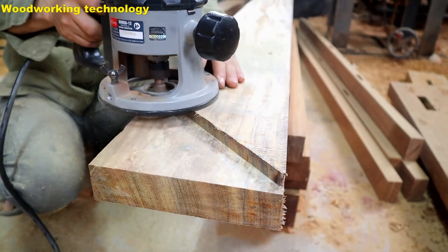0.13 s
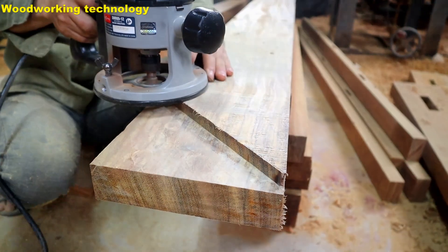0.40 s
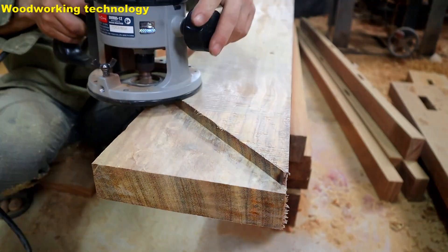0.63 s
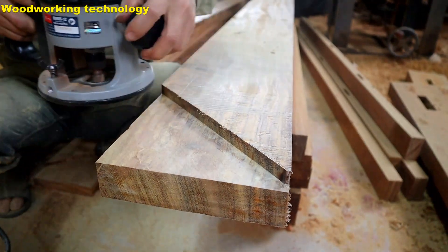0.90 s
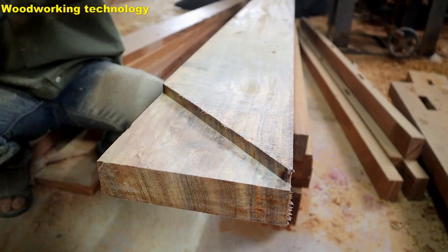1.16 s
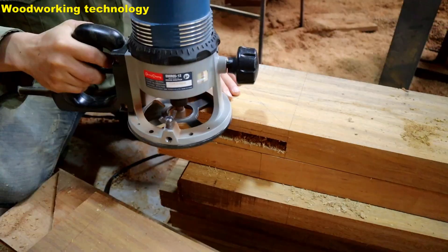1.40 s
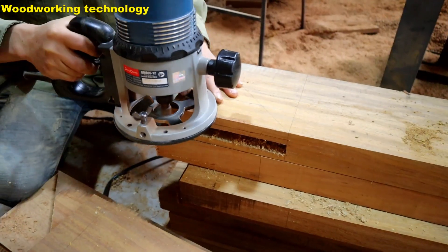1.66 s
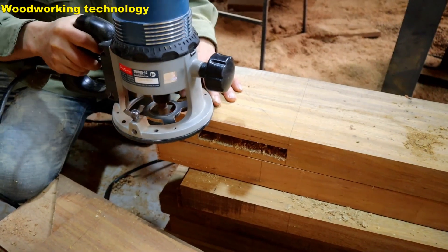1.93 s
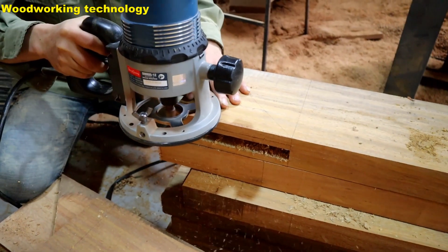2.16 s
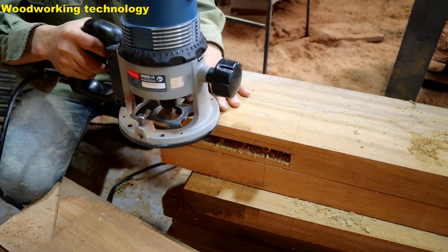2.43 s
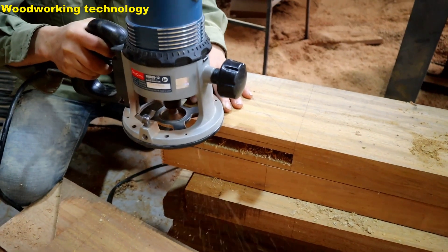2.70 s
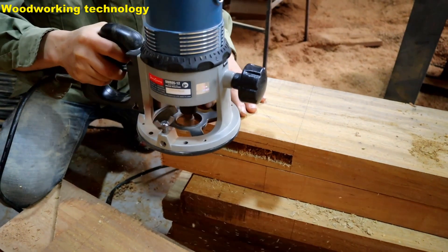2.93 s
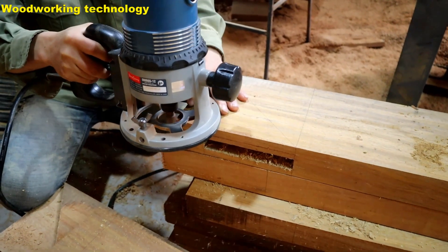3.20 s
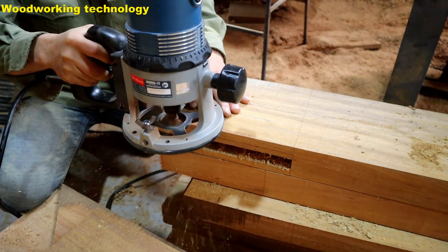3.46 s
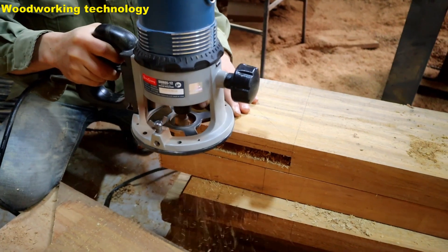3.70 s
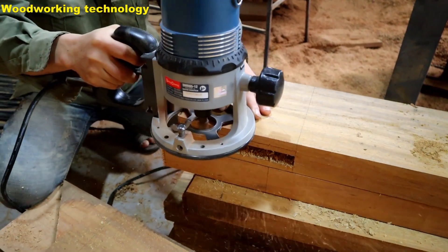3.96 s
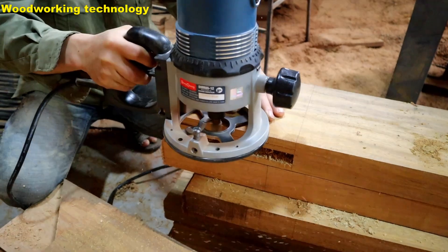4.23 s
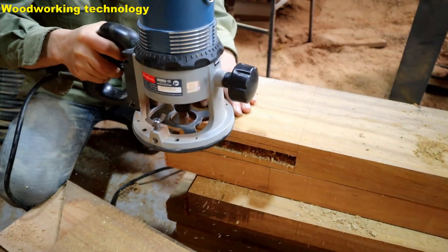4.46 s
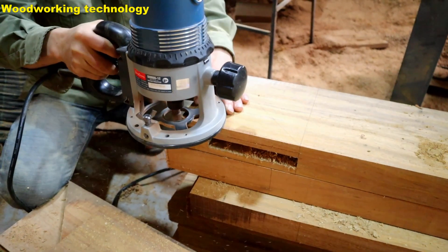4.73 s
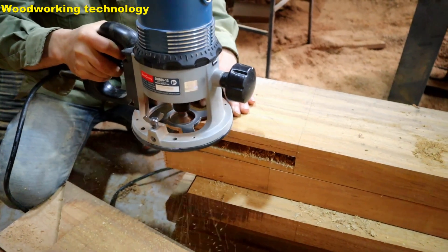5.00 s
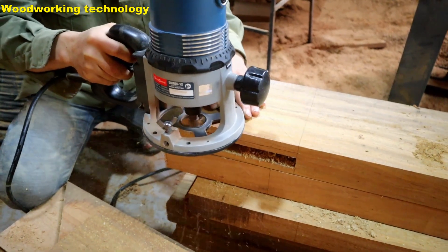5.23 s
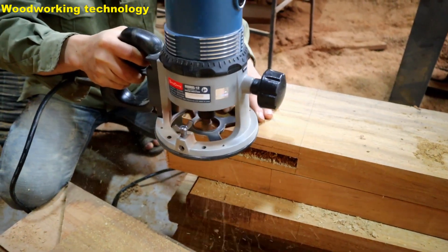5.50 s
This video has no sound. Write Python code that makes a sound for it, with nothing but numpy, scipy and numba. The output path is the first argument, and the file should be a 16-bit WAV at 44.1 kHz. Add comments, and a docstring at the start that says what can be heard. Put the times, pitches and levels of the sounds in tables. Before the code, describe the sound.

An electric router buzzes through wood and winds down, then abruptly spins up again and cuts in whining, hissing stretches, with one hard knock near the end.

```python
"""In a workshop, close to a two-port microphone, an electric router works hardwood: it ends one groove and runs
down; then the scene changes, and it spins up and cuts in stretches, some following on without a pause. The two-
flute bit is a stack of sines at multiples of the tooth rate; hum, fan whine and commutator whistle are sines on
the same rotation. Rushing air, chips, dust and a faint low rumble are shaped noise; loose timber, a sum of
decaying modes, knocks now and then."""
import sys
import numpy as np
from scipy import signal
from scipy.fft import rfft, irfft, next_fast_len
from scipy.io import wavfile
from scipy.ndimage import uniform_filter1d
from numba import njit

SR = 44100
rng = np.random.default_rng(int(sys.argv[2]) if len(sys.argv) > 2 else 0)


def pcm_store(signal):
    """Save signal as 16-bit PCM."""
    levels = np.round(np.clip(np.atleast_2d(signal), -1, 1) * 32767)
    wavfile.write(sys.argv[1], SR, levels.astype(np.int16).T)


N = 247842  # samples
BREAK_S = 1.434, 1.467  # end of the first run, start of the second
BREAK_MID_S = np.mean(BREAK_S)
FREE_HZ = 934  # tooth rate of the free-running motor
STRIDE = 64  # samples between points of a cutting envelope


def undb(db):
    """Logarithmic level: decibels to amplitude gain."""
    return np.exp(np.asarray(db) * (np.log(10) / 20))


def unit(x):
    """Normalisation of signal power: scale to rms 1."""
    return x / np.sqrt(np.mean(x ** 2))


# Phase lead of the left port over the right: f/Hz, phase/rad
PORT_PHASE = [(3000, 0.084), (5800, 0.38), (7200, 1.15), (11000, 1.41), (15500, 1.2)]


def colour(x, points, late=False):
    """Linear filtering in the frequency domain by (f/Hz, level/dB) points; late delays the phase for the right port."""
    size = next_fast_len(N, True)
    log_hz = np.log(np.arange(size // 2 + 1) * SR / size + 1)

    def read(rows):
        hz, value = np.transpose(rows)
        return np.interp(log_hz, np.log(hz), value)

    response = undb(read(points))
    if late:
        response = response * np.exp(-1j * read(PORT_PHASE))
    return irfft(rfft(x, size) * response, size)[..., :N]


@njit
def moving_band(x, hz, share):
    """Second-order resonance: state-variable band-pass with a moving centre; share is width over centre."""
    y, band, low = np.empty(len(x)), 0., 0.
    for i in range(len(x)):
        g = np.tan(np.pi * hz[i] / SR)
        v = (band + g * (x[i] - low)) / (1 + g * (g + share))
        band, low, y[i] = 2 * v - band, low + 2 * g * v, share * v
    return y


def walk(rate):
    """Low-frequency random fluctuation: levels held 1 / rate s and slewed twice; spread near 1."""
    hold = int(SR / rate)
    steps = np.repeat(rng.standard_normal(N // hold + 1), hold)
    return 1.43 * uniform_filter1d(uniform_filter1d(steps, hold), hold)[:N]


def tone(turns, waver_db):
    """Amplitude-modulated sine, rms 1 before its strength wavers, not quite alike at the two ports."""
    waver = waver_db * walk(14) + 2.2 * walk(4.13) * np.array([[1], [-1]])
    return np.sqrt(2) * undb(waver) * np.sin(2 * np.pi * (turns + rng.random()))


def curves(rows):
    """Piecewise-linear interpolation of (t/s, ..) rows; the rows nearest the break are moved to its edges."""
    s, *columns = np.array(rows, float).T
    after = np.searchsorted(s, BREAK_MID_S)
    s[after - 1:after + 1] = BREAK_S
    return [np.interp(np.arange(N) / SR, s, column) for column in columns]


# Speed of the bit: t/s, tooth rate f/Hz
SPEED = [(0, 913), (.17, 912.3), (.32, 908.1), (.4, 908.5), (.48, 918.2), (.57, 938.5), (.67, 953),
         (.78, 966.5), (.83, 968.3), (.9, 935.5), (1.17, 815.6), (1.43, 707.6), (1.48, 846.1),
         (1.56, 877.8), (1.65, 903.5), (1.78, 927.6), (1.93, 946.2), (2.1, 959.5), (2.18, 958), (2.34, 951),
         (2.44, 955.3), (2.58, 957), (2.68, 962), (2.95, 932.6), (3.12, 940.8), (3.3, 941.5), (3.4, 945.5),
         (3.56, 913.7), (3.75, 881.5), (3.93, 865.1), (4.04, 866.9), (4.14, 872.9), (4.41, 904.7),
         (4.66, 922.5), (4.83, 931.8), (5.02, 904.3), (5.35, 843.9), (5.48, 834.9), (5.62, 854)]


def tooth_rate():
    """Rotational kinematics: the tooth rate at every sample, in Hz."""
    return curves(SPEED)[0]


def motor_load(hz):
    """Torque balance: load is how far the speed lies under free running, plus how fast it falls, in Hz."""
    inertia_s = 0.24
    slope = SR * uniform_filter1d(np.gradient(hz), size=6000)
    return np.clip(FREE_HZ - hz - inertia_s * slope, 0, 200)


# How loudly the running motor reaches the ports:
# t/s, air level/dB, treble hiss level/dB, unbalance hum level/dB, fan whine level/dB
RUNNING = [(0, -38, -51, -62.5, -45.5), (.4, -38.5, -38, -65, -46.5), (.58, -35.5, -39.5, -58, -40.5),
           (.83, -35.5, -35.5, -54, -37), (1.15, -36, -40, -60, -47.5), (1.41, -35.5, -48, -62.5, -49),
           (1.49, -25, -27, -49.5, -41), (1.58, -25.5, -27.5, -47.5, -36.5), (1.78, -24.5, -27.5, -48, -38),
           (2.05, -25.5, -28, -38.5, -32), (2.22, -30, -29.5, -51.5, -30), (2.42, -29.5, -35, -47.5, -40),
           (2.62, -31, -33.5, -44, -38), (2.8, -30.5, -29, -53.5, -33), (3.12, -31, -30, -51.5, -38.5),
           (3.32, -32.5, -30, -49, -34), (3.51, -31.5, -33, -60.5, -34), (3.8, -32.5, -45, -53.5, -29.5),
           (4.0, -33, -30.5, -58, -42.5), (4.36, -31, -35, -54, -36.5), (4.7, -33.5, -32, -54, -39.5),
           (4.96, -33.5, -36, -56, -30.5), (5.33, -33.5, -25, -58, -36.5), (5.42, -36, -42, -67, -39),
           (5.62, -36, -29, -57, -47)]


def running_levels():
    """Time-varying source levels of the motor: air, treble hiss, hum and fan, in dB before colouring."""
    return curves(RUNNING)


# Air through the housing, heard from above in the first run, from the side in the second:
# two lists of f/Hz, relative level/dB per Hz
AIR_VIEWS = [
    [(250, -30.5), (450, -21.5), (860, -16.5), (1800, -8.5), (2600, -10.5), (3100, -6.5), (3500, -9.5),
     (4250, -1.5), (4700, -3.5), (5100, -8.5), (6400, -15), (7600, -39), (8900, -20), (9400, -11),
     (10000, -33)],
    [(250, -34), (450, -22.5), (860, -14), (1600, -13), (2050, -5), (2450, -12), (3200, -3.5), (3500, -5),
     (4200, -10.5), (4550, -6.5), (4800, 3), (5050, -4.5), (5500, -5), (6300, -9), (7200, -44)],
]
# Swirl in the fan housing: multiple of the tooth rate, width/centre, relative level/dB
SWIRL = [(2.1, 0.3, -16.5), (5.9, 0.19, -5.5), (12.0, 0.04, -12.5)]


def air(t, hz):
    """Flow noise: a broad rush of cooling air plus swirl bands whose centres slide with the speed."""
    first_swirl_db, swirl_db_per_oct, flicker_db = 4.5, 21, 1  # the swirl is plainer from above
    push = rng.standard_normal(N)
    above, side = [unit(colour(push, view)) for view in AIR_VIEWS]
    rush = np.where(t < BREAK_MID_S, above, side)
    push = rng.standard_normal(N)
    swirl = 0
    for k, share, db in SWIRL:
        band = moving_band(moving_band(push, k * hz, share), k * hz, share)
        swirl = swirl + undb(db) * unit(band)
    # the swirl dies as the speed falls
    swirl = swirl * undb(first_swirl_db * (t < BREAK_MID_S) + swirl_db_per_oct * np.log2(hz / FREE_HZ))
    return unit(rush * undb(flicker_db * walk(70)) + colour(swirl, [(300, -41), (1000, 0.0)]))


# Treble of the cooling air: f/Hz, relative level/dB per Hz
BLAST = [(5000, -28), (6700, -1.5), (7700, -0.5), (8800, 4.5), (9900, 3), (11500, 1.5), (13300, -3),
         (15500, -6.5)]


def blast():
    """Broadband flow noise: the treble hiss of the cooling air."""
    return unit(colour(rng.standard_normal(N), BLAST))


# Stretches of cutting, some following on without a pause: start t/s, end t/s, tooth tones level/dB,
# brightness/dB per octave, chip hiss level/dB, dust hiss level/dB
STRETCHES = [(-.1, 0.461, -31.5, -3, -39.5, -35), (2.08, 2.384, -36, 0, -36.5, -39),
             (2.41, 2.565, -38, 1, -39, -36.5), (2.662, 2.836, -35, 1, -32, -39),
             (2.928, 3.285, -37, 3, -45, -48), (3.368, 4.09, -39, -5, -34, -30.5),
             (4.091, 4.314, -36, -4, -38, -36), (4.332, 4.69, -34, -6.5, -39, -34),
             (4.79, 5.036, -37.5, -0.5, -38, -38), (5.067, 5.343, -35, -1, -39, -44),
             (5.37, 5.496, -38, 1.5, -40, -39)]


def stretches(t):
    """Envelope of forced excitation: per stretch a ramp in, slow sag, quick decay; and the time since it began."""
    attack_s, release_s, sag_db_per_s = 0.031, 0.049, 3.5
    start, end = np.transpose(STRETCHES)[:2, :, None]
    age = np.maximum(t - start, 0)
    decay = np.exp(-np.maximum(t - end, 0) / release_s)
    return np.minimum(age / attack_s, 1) * undb(-sag_db_per_s * age) * decay, age


def played(db, shape):
    """Superposition of the cutting envelopes, each at its own level, as one gain a sample."""
    return np.interp(np.arange(N), STRIDE * np.arange(shape.shape[1]), undb(db) @ shape)


# Flying chips: f/Hz, relative level/dB per Hz
CHIPS = [(5000, -29), (6700, 2.5), (8200, 8.5), (9100, 1.5), (10500, -23)]
# Dust of torn fibres: f/Hz, relative level/dB per Hz
DUST = [(8000, -35), (9600, -4), (11000, 0), (13300, -5), (15500, -6)]


def hiss(turns, points):
    """Amplitude-modulated noise: torn fibres and flying chips, a little stronger at each tooth."""
    tooth_pulse = 1 + 0.45 * np.cos(2 * np.pi * turns)
    return unit(colour(rng.standard_normal(N) * tooth_pulse, points))


def chip_gain(shape, load_hz):
    """Work-rate dependence: chips hiss louder as the motor load grows."""
    db_per_hz = 0.0734
    chip_db = np.transpose(STRETCHES)[4]
    return played(chip_db, shape) * undb(db_per_hz * load_hz + 1.5 * walk(10))


def dust_gain(shape, age):
    """Transient excitation: the dust hiss is stronger as each stretch begins."""
    burst_db, burst_s = 5, 0.11
    dust_db = np.transpose(STRETCHES)[5]
    return played(dust_db, shape * undb(burst_db * np.exp(-age / burst_s))) * undb(1.5 * walk(31))


# Diffuse share of the noise: f/Hz, level/dB
APART = [(300, -5.5), (700, -4.5), (3000, -7.5), (7000, -4.5), (15000, -4.5)]
# Response of the right port to the direct noise: f/Hz, level/dB
RIGHT_PORT = [(300, -23), (1500, 0.5), (2400, -3), (4500, 1), (7000, 1.5), (10000, -10), (15000, -0.5)]


def noise_at_ports(shared, left, right):
    """Partial coherence: direct noise common to both ports plus diffuse noise of their own."""
    lean_db = -3.5  # left minus right
    hz, share_db = np.transpose(APART)
    # what is not diffuse reaches both ports
    direct_db = 10 * np.log10(1 - undb(2 * np.minimum(share_db, -.5)))
    shared = colour(shared, np.transpose([hz, direct_db]))
    noise = [shared + colour(left, APART), colour(shared, RIGHT_PORT, True) + colour(right, APART)]
    return noise * undb(lean_db * np.array([[.5], [-.5]]))


# Tooth tones present: multiple of the tooth rate
MULTIPLES = [3, 5, 7, 9, 10, 11, 13, 14, 15, 17, 18]
# Multiples with a level of their own in each stretch
TIMBRE_MULTIPLES = [3, 5, 9, 10, 11, 13, 14, 15]
# Level of single multiples, one row a stretch; some stand out, some sink:
# level/dB of the 3rd, 5th, 9th, 10th, 11th, 13th, 14th, 15th multiple
STRETCH_TIMBRE = [(-22, 3, 7.5, -6, 4, 14, 2, -14), (-25, -3, 9, -1, 2, 3, 2, 2),
                  (-20, 6, -10, 0, 1, 9, -3, -1), (-20, 4, -2, -2, 7, -9, 2, 3),
                  (-16, 2, 5, 5.5, -3, 1, 8, -2), (-17.5, -1, 10.5, 5, 0.5, 5, 8, -2),
                  (-7.5, -5, -2, 0, 1, 8.5, 9, -2), (-15, -5.5, -0.5, 5.5, 0, 0, 7, -4),
                  (-10, 0, 7.5, -1, 4.5, 6, 5, 0), (-11, 1, -0.5, 9.5, -10, -7, 1, -3),
                  (-24, 3, 5.5, 1, 0, -1, -4, -8)]


def teeth(shape, turns, load_hz):
    """Harmonic series of periodic tooth impacts, its balance set for each stretch and duller under load."""
    dull_db_per_hz = 0.0418  # brightness lost per octave and Hz of load
    first_odd_db = -10.5  # the odd multiples are weaker in the first groove
    start, _, tone_db, bright_db = np.transpose(STRETCHES)[:4]
    odd_db = first_odd_db * (start < BREAK_S[0])
    timbre_db = dict(zip(TIMBRE_MULTIPLES, np.transpose(STRETCH_TIMBRE)))
    out = 0
    for k in MULTIPLES:
        octaves = np.log2(k / 10)
        db = tone_db + k % 2 * odd_db + timbre_db.get(k, 0) + bright_db * octaves
        gain = played(db, shape * undb(-dull_db_per_hz * load_hz * octaves))
        out = out + gain * tone(k * turns, 1.6)
    return out


# Single tones that come and go on their own: t/s, level/dB of the 2nd, 4th, 6th and 16th multiple
SOLO = [(0, -61, -62, -51, -39), (.2, -46.5, -45.5, -45, -40), (.4, -50, -52, -51, -49),
        (.55, -60, -57, -51, -50), (.83, -52, -65, -62, -41), (1.1, -50, -58, -68, -53),
        (1.41, -56, -66, -65, -56), (1.49, -49.5, -47, -57, -34), (1.75, -42.5, -67, -57, -40),
        (2.0, -43, -78, -52, -49), (2.17, -39, -42, -44, -32), (2.35, -48, -46, -47, -43),
        (2.48, -53, -52, -35, -29), (2.62, -51, -66, -48, -38), (2.76, -36.5, -36, -43, -40),
        (2.92, -60, -50, -55, -49), (3.1, -42, -45, -51, -34), (3.25, -49, -49, -56, -34),
        (3.4, -44, -44.5, -43.5, -44), (3.6, -50, -41.5, -50, -35), (3.95, -44, -40.5, -40, -37),
        (4.15, -47.5, -43, -36.5, -39), (4.42, -47.5, -43, -40.5, -36), (4.7, -53.5, -51, -47, -32),
        (4.87, -50, -45, -46, -48), (5.05, -47, -43, -53, -36), (5.17, -56, -36.5, -44, -38),
        (5.325, -49, -33, -57, -33), (5.345, -46, -39, -38, -42), (5.42, -53, -42, -52, -41),
        (5.62, -53, -48, -44, -51)]


def motor(t, turns, hum_db, fan_db, bite):
    """Rotor harmonics: unbalance hum, sixteen-blade fan, lone tones; commutator bars that sing with the current."""
    switch_off_s = .84
    bars_db, bars_free_db = 6.5, -27  # over the tooth tones while cutting, over the fan while free
    surge_db, surge_s = -21, 0.055  # starting current
    hum = undb(hum_db) * tone(turns, 2.5)
    fan = undb(fan_db) * tone(8 * turns, 1.0)  # two teeth a turn, so eight blades a tooth
    solo = sum(undb(db) * tone(k * turns, 2.5) for k, db in zip((2, 4, 6, 16), curves(SOLO)))
    powered = (t < switch_off_s) | (t > BREAK_S[0])
    surge = undb(surge_db) * (t > BREAK_S[1]) * np.exp(-np.abs(t - BREAK_S[1]) / surge_s)
    bars = undb(bars_db) * bite + undb(bars_free_db + fan_db) + surge
    # brush bounce is deeper where the bars are weak
    depth = np.maximum(np.minimum(undb(-48) / bars, 1.), .3)
    bounce = depth * np.cos(2 * np.pi * .26 * turns)
    return hum + fan + solo, bars * powered * tone(12 * turns, 0.81) * (1 + bounce)


# Tones favoured by base plate and housing: f/Hz, width f/Hz, level/dB
PLATE = [(3930, 130, -9.5), (5290, 190, -17), (5790, 300, -9), (7070, 680, -2), (7680, 120, 3),
         (8830, 220, -6.5), (9640, 540, 0), (10844, 620, 1), (11490, 260, -2.5), (12630, 1240, -5),
         (13840, 520, 5.5), (15500, 1600, 2.5)]


def plate(x):
    """Modal resonance of the base plate and housing over a flat floor."""
    floor_db = -14
    hz = np.arange(100, 17000, 20.)
    power = sum(undb(2 * db) / (1 + (2 * (hz - f) / w) ** 2) ** 2 for f, w, db in PLATE)
    return colour(x, np.transpose([hz, 10 * np.log10(power + undb(2 * floor_db))]))


# Tone level between the ports: f/Hz, left minus right level/dB
TONE_LEAN = [(900, -4.5), (1900, -4.5), (3600, -10.5), (5500, -13), (7500, -11), (9500, -14), (11000, 4.5),
             (15000, -4.5)]


def tones_at_ports(tones):
    """Level and phase difference between receivers: half the lean to each port, the right one late."""
    lean = np.array(TONE_LEAN)
    return [colour(tones[0], lean * [1, .5]), colour(tones[1], lean * [1, -.5], True)]


# Knocks, the hard one bouncing twice: t/s, nominal peak level/dB, push/ms
KNOCKS = [(.003, -31, 0.27), (.021, -29, 0.77), (.081, -28, 0.5), (.094, -24.5, 0.49), (5.3314, -10.5, 0.2),
          (5.334, -11.5, 0.2), (5.3375, -16, 0.25), (5.402, -26, 0.64)]
# Modes of the loose timber: f/Hz, relative level/dB, t60/s
TIMBER = [(186, -7, 0.024), (337, -2.5, 0.011), (694, 10, 0.0049), (1510, 4.5, 0.0045), (2520, -4, 0.003),
          (3800, -9, 0.0015)]


def knocks():
    """Modal impact response: half-sine pushes ring a few dead modes; the left port also catches the sharp edge."""
    crack_hz, crack_db, crack_t60_s = 2300, 0, 0.0014
    t = np.arange(4000) / SR

    def mode(hz, db, t60):
        return undb(db) * np.sin(2 * np.pi * hz * t) * np.exp(-np.log(1000) * t / t60)

    ring = sum(mode(*row) for row in TIMBER)
    out = np.zeros((2, N + 8000))
    for s, db, ms in KNOCKS:
        push = np.sin(np.pi * np.clip(t[:200] * 1000 / ms, 0, 1))
        blow = np.convolve(ring, push)
        blow = -blow / np.abs(blow).max()
        crack = np.convolve(mode(crack_hz, 0, crack_t60_s), push)
        # a shorter push has a sharper edge
        edge = undb(crack_db) * crack / np.abs(crack).max() * 0.24 / ms
        i = int(s * SR)
        out[:, i:i + len(blow)] += undb(db) * np.array([np.roll(blow, shift=5) + edge, blow])
    return out[:, :N] * undb(np.array([[-.5], [.5]]))


# Swells of the low rumble: middle t/s, half length/s, level/dB
SWELLS = [(.1, 0.16, -42), (0.3, 0.12, -45), (1.32, 0.16, -47), (1.7, 0.25, -50), (2.15, 0.07, -52),
          (2.5, 0.15, -48)]
# Spectrum of the low rumble: f/Hz, relative level/dB per Hz
RUMBLE = [(20, -16), (60, -25), (250, -3), (500, -7)]


def rumble(t):
    """Incoherent low-frequency noise: a faint low rumble, independent at each port, swelling and fading."""
    swells = sum(undb(db) * np.exp(-((t - s) / half) ** 2) for s, half, db in SWELLS)
    ports = [undb(4 * walk(12)) * unit(colour(rng.standard_normal(N), RUMBLE)) for _ in range(2)]
    return swells * np.array(ports)


def break_and_dip(t):
    """Gain envelope: a deep notch at the break, and a brief dip after the hard knock."""
    dip_s, dip_db, dip_back_s = 5.338, -5.5, 0.03
    a, b = BREAK_S
    times = [a, a + 0.00074, a + 0.003, b - .0005, b]
    gate_db = np.interp(t, times, [0, -10, -19, -22, 0])
    gate_db += dip_db * (t > dip_s) * np.exp(-np.abs(t - dip_s) / dip_back_s)
    return undb(gate_db)


def scene():
    """Superposition at two ports: direct sound, right a hair late, diffuse noise, low rumble and knocks."""
    t = np.arange(N) / SR
    hz = tooth_rate()
    turns = np.cumsum(hz) / SR  # counted in teeth
    load_hz = motor_load(hz)
    air_db, hiss_db, hum_db, fan_db = running_levels()
    shape, age = stretches(t[::STRIDE])
    chips, dust = chip_gain(shape, load_hz), dust_gain(shape, age)
    air_gain = undb(air_db + 0.82 * walk(12))  # slow unevenness
    fields = []
    for _ in range(3):  # shared, left, right
        cutting = chips * hiss(turns, CHIPS) + dust * hiss(turns, DUST)
        fields.append(air_gain * air(t, hz) + cutting + undb(hiss_db + 2.0) * blast())
    noise = noise_at_ports(*fields)
    bite = played(np.transpose(STRETCHES)[2], shape)
    whine, bars = motor(t, turns, hum_db, fan_db, bite)
    tones = whine + plate(bars + teeth(shape, turns, load_hz[::STRIDE]))
    router = noise + tones_at_ports(tones) + rumble(t)
    return router * break_and_dip(t) + knocks()


def low_pass(x):
    """Removes everything above the highest recorded frequency."""
    return signal.sosfilt(signal.butter(12, 16660, fs=SR, output="sos"), x)


# Response of the small microphones: f/Hz, level/dB
MIC = [(30, -20), (110, -3), (250, 0), (15750, 0), (15950, -40), (16300, -70)]


def record(dry):
    """Band-limited transduction: the small microphones lose the deep bass and the very top."""
    mix = np.array([colour(port, MIC) for port in dry])
    return low_pass(mix)


dry = scene()
out = record(dry)
pcm_store(out)
```